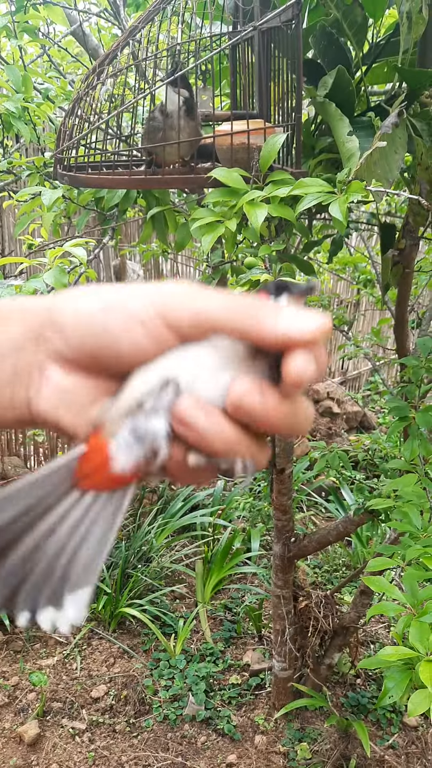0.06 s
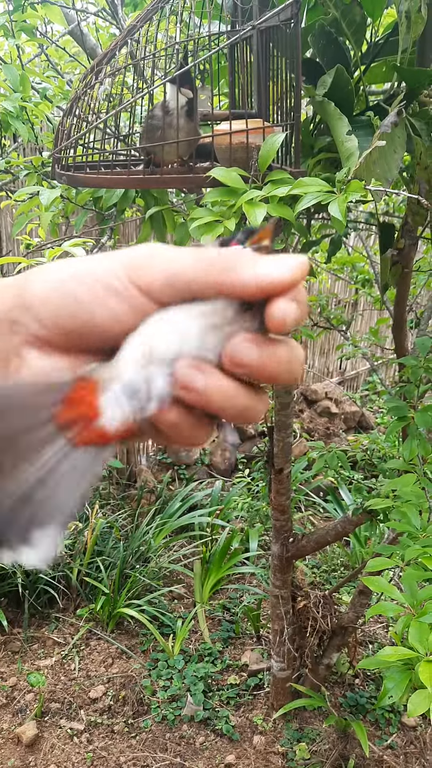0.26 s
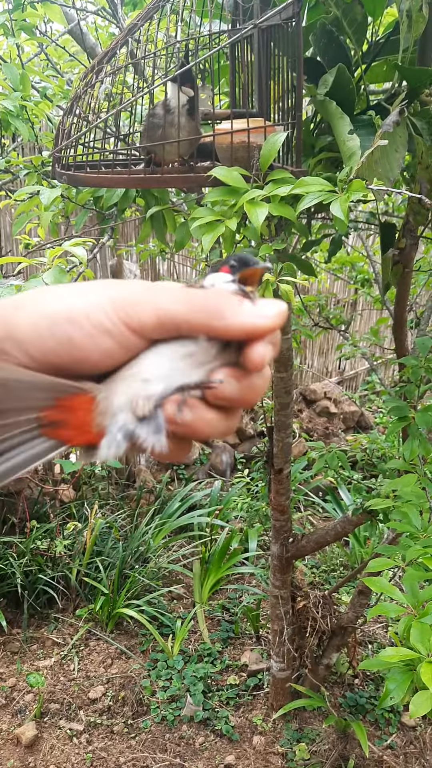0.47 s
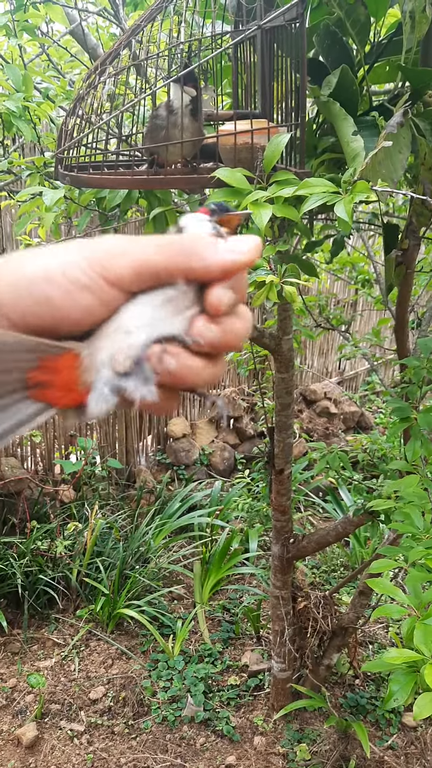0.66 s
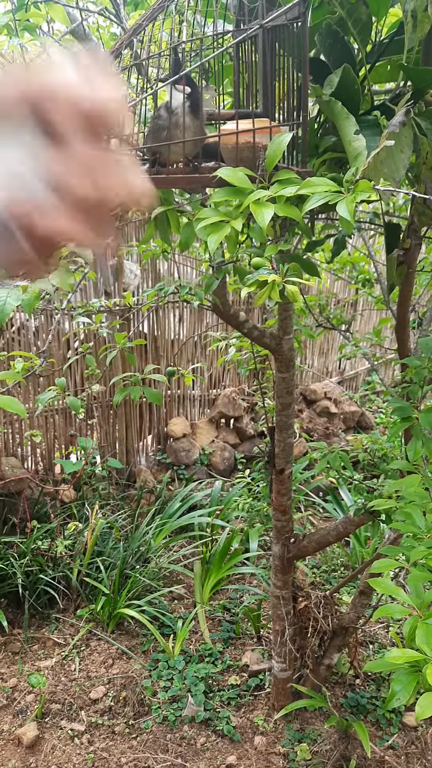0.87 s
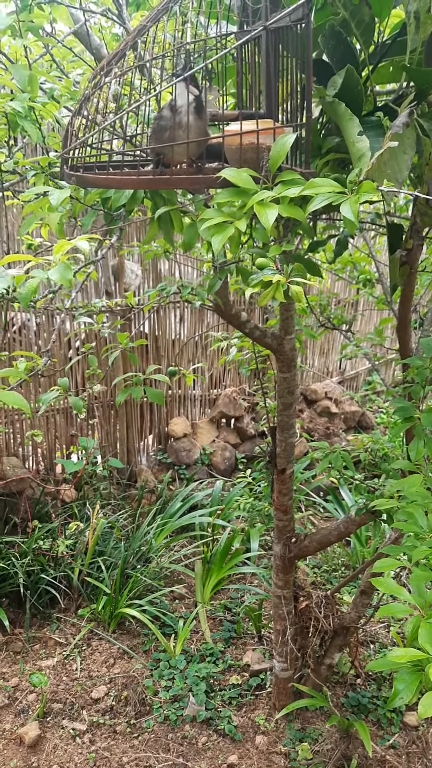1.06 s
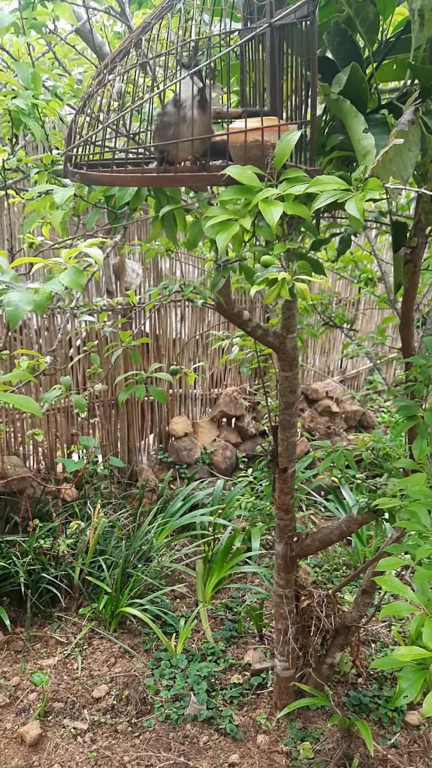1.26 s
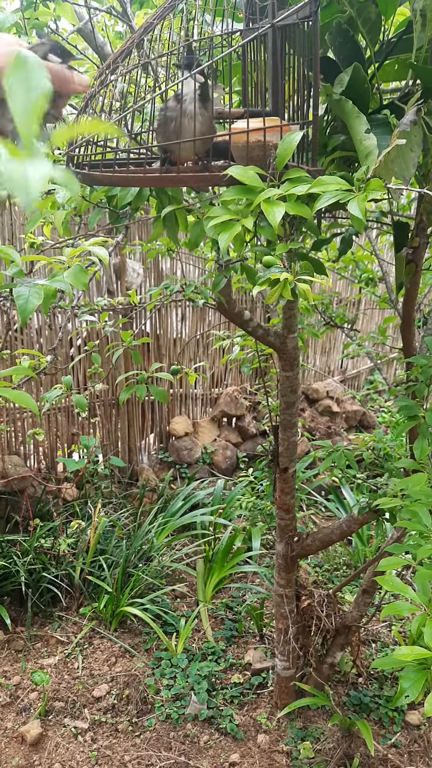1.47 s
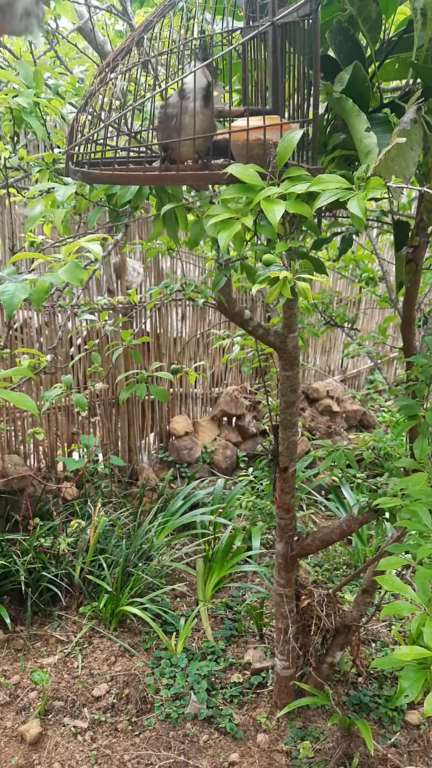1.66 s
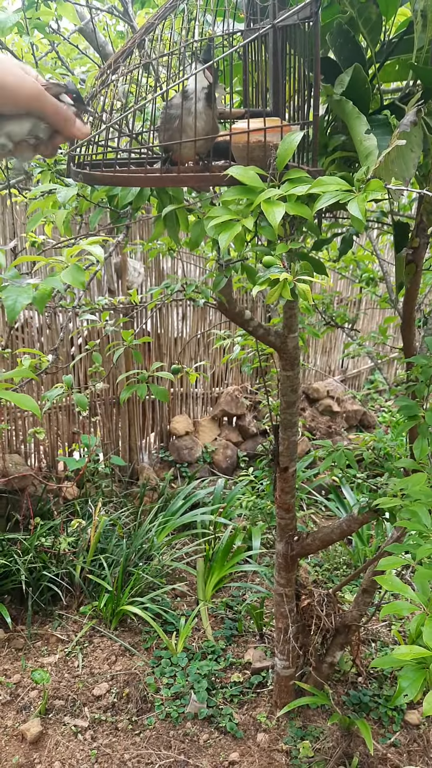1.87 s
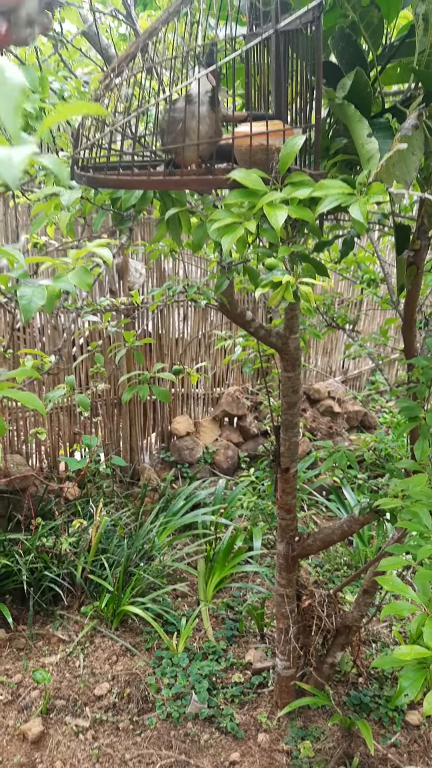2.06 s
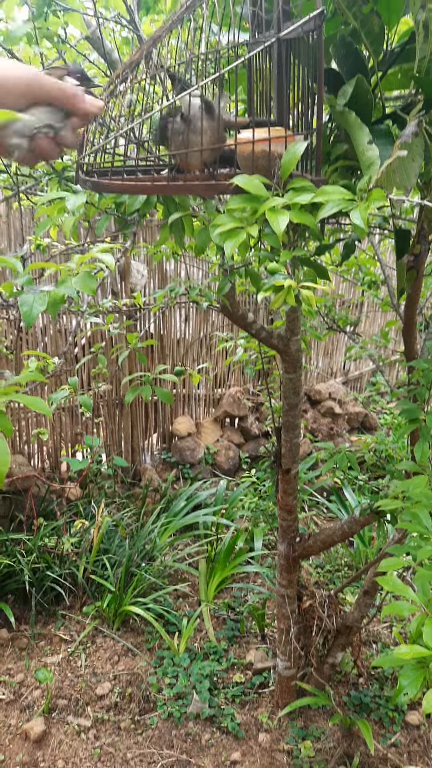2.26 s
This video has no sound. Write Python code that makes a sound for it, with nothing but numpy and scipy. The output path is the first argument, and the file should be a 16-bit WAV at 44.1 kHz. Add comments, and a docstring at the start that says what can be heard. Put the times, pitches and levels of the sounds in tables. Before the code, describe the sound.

Close up in a quiet garden, a small bird held in the hand screams three times in a raspy, trembling voice edged with hiss. Faint whimpers slip between the later cries, and a brief, weaker scream comes last.

```python
"""A faint garden hush, and almost at once a small hand-held bird screams, four times, close up.
Each scream is a fluttering tone from the trembling syrinx that keeps breaking into rasp and half-pitch
lines, shaped by the throat and topped with beak hiss. The first three fall at the end; the last is short
and weak. Two faint whimpers and a small double tick lie between them.
Hand, leaves and fence throw back sparse echoes."""
import sys
import numpy as np
from scipy import signal
from scipy.fft import rfft, irfft, next_fast_len
from scipy.io import wavfile
from scipy.ndimage import uniform_filter1d, map_coordinates

SR = 44100
rng = np.random.default_rng(int(sys.argv[2]) if len(sys.argv) > 2 else 0)


def wav_record(signal):
    """Record a signal, one row per channel, as 16-bit PCM in the file named by sys.argv[1]."""
    frames = np.transpose(np.atleast_2d(signal))
    bounded = np.clip(frames, -1, 1)
    # unit amplitude maps onto the largest positive 16-bit level
    quanta = np.round(bounded * 32767).astype(np.int16)
    wavfile.write(sys.argv[1], SR, quanta)


N = 101429

# tone colour of the garden bed: f/Hz, level/dB
GARDEN_EQ = [(20, -23), (60, -11), (100, 3), (160, -11), (300, -4.5), (600, -14.5), (1200, -19),
             (2800, -11), (4500, -27.5), (6000, -10.5), (8000, -33.5), (16000, -31.5)]
# contour of each scream: t/s, pitch/Hz, fundamental/dB, octave/dB, upper partials/dB, hiss/dB
SCREAM_1 = [(0.11, 1130, -69, -59.5, -65.5, -97), (0.155, 1128, -50.5, -35, -46, -71.5),
            (0.2, 1207, -41.5, -18, -33.5, -46), (0.25, 1330, -42.5, -22.5, -26.5, -46.5),
            (0.31, 1470, -39, -19, -21.5, -28.5), (0.355, 1605, -36.5, -19.5, -27.5, -29),
            (0.39, 1868, -29, -24.5, -26.5, -31), (0.425, 1966, -30.5, -24.5, -26.5, -28),
            (0.45, 2035, -27, -25, -22.5, -29), (0.49, 2029, -24.5, -24, -25.5, -24.5),
            (0.54, 1991, -26, -24, -23.5, -26), (0.585, 2036, -23, -24, -30.5, -27.5),
            (0.62, 2089, -21, -21.5, -25, -29.5), (0.634, 1135, -47, -42, -45.5, -85)]
SCREAM_2 = [(0.772, 1750, -56.5, -54, -64, -54), (0.79, 1678, -42.5, -40, -44.5, -46),
            (0.825, 1575, -39, -23, -31, -34.5), (0.885, 1503, -36, -19.5, -22, -29),
            (0.93, 1531, -36.5, -13.5, -27.5, -28.5), (0.96, 1609, -34, -14.5, -34, -30),
            (1.02, 1567, -37, -17.5, -31.5, -29.5), (1.06, 1487, -50, -21.5, -23.5, -28.5),
            (1.11, 1475, -47.5, -22.5, -32.5, -41.5), (1.145, 1612, -44, -22.5, -36, -38.5),
            (1.185, 1612, -34, -22, -29, -26.5), (1.22, 1536, -45, -23.5, -31, -32.5),
            (1.29, 1778, -30.5, -29, -40, -27.5), (1.341, 1973, -27.5, -34.5, -25, -28),
            (1.352, 1400, -53, -33.5, -47, -62)]
SCREAM_3 = [(1.495, 1798, -60.5, -58.5, -51, -55.5), (1.545, 1746, -50, -37.5, -35.5, -38.5),
            (1.59, 1780, -40, -34, -39.5, -37.5), (1.635, 1610, -45.5, -25, -44, -33.5),
            (1.67, 1645, -45.5, -28, -44, -38.5), (1.705, 1860, -42, -40, -32, -39.5),
            (1.75, 2058, -43, -30, -41.5, -38), (1.79, 1988, -42.5, -34, -30.5, -37.5),
            (1.845, 1945, -42, -33, -32.5, -32.5), (1.89, 1876, -38, -31, -36, -34),
            (1.94, 2009, -39, -30.5, -31.5, -32.5), (1.974, 2130, -35.5, -30, -38, -31),
            (1.991, 1700, -37.5, -34.5, -30.5, -49), (2.002, 1150, -50.5, -52, -47, -70)]
SCREAM_4 = [(2.2, 1556, -70, -73.5, -60.5, -68), (2.24, 1615, -49.5, -52, -46.5, -49),
            (2.265, 1760, -46, -45, -41.5, -42.5), (2.295, 1832, -41.5, -45, -41.5, -39.5)]
# how the voice breaks up: t/s, roughness/0-1, period doubling/0-1
BREAKUP = [(.12, .9, .06), (.2, .6, .06), (.31, .8, .25), (.38, .45, .2), (.46, .35, .25), (.61, .15, .2),
           (.78, .8, .03), (.88, .55, .03), (.93, .1, .02), (1.02, .12, .02), (1.06, .55, .04),
           (1.22, .55, .04), (1.31, .35, .08), (1.5, .7, .04), (1.63, .3, .02), (1.7, .5, .25),
           (1.76, .4, .9), (1.84, .5, .3), (1.92, .5, .2), (1.96, .15, .15), (2.21, .9, .05),
           (2.29, .6, .05)]
# tremolo, shallow where the tone is held steady: t/s, depth/0-1
TREMOLO = [(.2, .4), (.37, .35), (.42, .8), (.6, .55), (.8, .5), (.89, .95), (.93, .12), (1.02, .15),
           (1.05, .8), (1.2, .8), (1.3, .35), (1.64, .3), (1.72, .8), (1.92, .9), (1.95, .15), (2.29, .4)]
# partials above the octave, before the throat or hiss EQ: multiple of the pitch, level/dB
UPPER_PARTIALS = [(2.5, 12), (3, 3.5), (3.5, 15), (4, 7.5)]
TOP_PARTIALS = [(5, -4), (6, 2.5), (7, -14), (8, -19.5), (9, 4)]
# resonances of throat and beak (the last two screams share the third set): f/Hz, level/dB
THROAT_1 = [(2200, -72.5), (3000, 6.5), (3600, 3), (4400, 2), (5050, -5.5), (5600, -11.5), (6100, -23),
            (6700, -9), (7600, -31), (9000, -114)]
THROAT_2 = [(2900, -73), (3700, -15), (4300, 12), (4750, -5), (5250, 9), (6100, 9.5), (6800, -15.5),
            (7600, -7), (9000, -61)]
THROAT_3 = [(2400, -70), (2850, 6), (3150, 4.5), (3800, -8), (4500, -8), (5050, -8), (5750, -14.5),
            (6450, -1), (7400, -6.5), (9000, -83)]
# EQ of the beak hiss: f/Hz, level/dB
HISS_1 = [(5000, -78), (7600, -37.5), (8400, -3.5), (9800, -1.5), (11000, -6), (12500, -12), (14000, -1),
          (15200, 3.5), (16000, 0)]
HISS_2 = [(5000, -79.5), (7500, -4), (8500, -8.5), (9400, -3.5), (11000, -9), (12800, -16), (14000, -5),
          (15200, -4), (16000, -1)]
HISS_3 = [(5000, -65), (7500, 4), (9000, -5), (10400, 1.5), (11400, -1.5), (12700, -11.5), (14500, -8.5),
          (15500, -3), (16000, 2.5)]
# second voice from the other side of the syrinx, above the octave: t/s, f/Hz, level/dB
SECOND_VOICE = [(.12, 4900, -73), (.25, 5000, -30.5), (.45, 5080, -29.5), (.6, 5050, -50), (.64, 4900, -68),
                (.76, 5000, -49.5), (.8, 5000, -31.5), (.87, 5500, -45), (.92, 5700, -26), (.98, 5200, -27.5),
                (1.06, 5250, -27), (1.15, 5250, -28.5), (1.2, 5900, -26), (1.26, 6400, -29),
                (1.32, 5830, -27), (1.343, 5900, -27.5), (1.36, 5600, -46), (1.49, 7200, -57),
                (1.58, 7150, -33), (1.64, 6450, -28), (1.72, 6600, -36.5), (1.9, 6400, -51),
                (1.97, 6450, -35), (2.005, 5500, -57.5), (2.2, 6400, -76.5), (2.29, 6500, -54)]
# hiss sweep as the beak first opens: t/s, f/Hz, level/dB
BEAK_SWEEP = [(0.124, 8200, -67.5), (0.168, 10000, -48.5), (.21, 12000, -44), (0.249, 14800, -41),
              (.28, 15500, -45)]
# soft notes between screams: t/s, length/s, pitch/Hz, level/dB, vibrato/share of pitch
WHIMPERS = [(1.366, 0.0415, 1620, -44.5, 0.11), (2.074, 0.064, 1628, -46.5, 0.03)]
# the double tick: t/s, f/Hz, gain/dB
TICKS = [(1.399, 2020, -46), (1.435, 1947, -50.5)]
# stereo image at the two microphones: f/Hz, left minus right/dB
BALANCE_1 = [(1000, -5), (2000, 7), (3000, -0.5), (4100, -5), (5000, -1), (8000, -2), (10000, 13),
             (12000, 23), (15500, 15)]
BALANCE_2 = [(1000, 20.5), (1600, -9), (3100, -7), (5000, -4), (8000, -3), (10000, 14), (12500, 12),
             (15500, 15.5)]
BALANCE_3 = [(1000, -2.5), (2000, 16.5), (3000, -7.5), (3700, -0.5), (5000, -6.5), (8000, -3.5),
             (10500, 11.5), (12500, 6.5), (15500, 20)]

LAG_1, LAG_2, LAG_3 = 0.00021, 0.00025, 0.0002144  # delay of the right microphone/s
FLUTTER_HZ, FLUTTER_SPREAD, VIBRATO = 98, .22, .034  # rate/Hz, drift/share of rate, swing/share of pitch
JITTER_HZ, JITTER_CALM, JITTER_ROUGH = 300, .006, .028  # bandwidth/Hz, then shares of pitch


def amp(db):
    """Decibels to gain."""
    return 10 ** (np.asarray(db) / 20)


def unit(x):
    """Scales to an rms of one."""
    return x / np.sqrt(np.mean(x ** 2) + 1e-20)


def steady(x):
    """Holds the slow level at one and keeps the quick pulsing."""
    return x / np.sqrt(abs(uniform_filter1d(x ** 2, size=1200)) + 1e-9)


def curves(t, table):
    """One automation curve for each column after the time."""
    times, *columns = np.transpose(table)
    return [np.interp(t, times, column) for column in columns]


def add(mix, start, sound):
    """Mixes a sound in at a time in seconds."""
    part = mix[..., max(round(start * SR), 0):][..., :sound.shape[-1]]
    part += sound[..., :part.shape[-1]]


def colour(x, eq):
    """Applies an EQ curve of f/Hz, level/dB."""
    f, db = np.transpose(eq)
    size = next_fast_len(len(x) + 1024)
    hz = np.fft.rfftfreq(size, 1 / SR)
    gain = amp(np.interp(np.log(hz + 1), np.log(f), db))
    return irfft(rfft(x, size) * gain, size)[:len(x)]


def wander(count, hz):
    """Smooth random modulation up to a rate, with an rms of one."""
    f = np.fft.rfftfreq(count, 1 / SR)
    return unit(irfft(rfft(rng.standard_normal(count)) / (1 + (f / hz) ** 8), count))


def blend(a, b, share):
    """Equal-power crossfade from a to b."""
    share = np.clip(share, 0, 1)
    return np.sqrt(1 - share) * a + np.sqrt(share) * b


def fuzz(phase, width_hz):
    """A band of noise that rides on a partial, reaching width_hz to either side."""
    n = len(phase)
    return unit(wander(n, width_hz) * np.cos(phase) + wander(n, width_hz) * np.sin(phase))


def garden():
    """A faint steady bed of outdoor rumble and air, nearly mono."""
    shared, left, right = [unit(colour(rng.standard_normal(N), GARDEN_EQ)) for _ in range(3)]
    return amp(-70.5) * blend(shared, np.array([left, right]), 0.1)


def partials(phase, table, doubling):
    """A stack of partials of unit power; half multiples sound only with period doubling."""
    gains = [amp(db) * (doubling if round(2 * k) % 2 else np.ones(len(phase))) for k, db in table]
    stack = sum(g * np.cos(k * phase + rng.uniform(0, 2 * np.pi)) for g, (k, _) in zip(gains, table))
    return stack / np.sqrt(sum(g ** 2 for g in gains) / 2)


def throat_noise(pitch, throat, tracking):
    """Noise in the throat resonances, which follow the pitch by the exponent `tracking`."""
    position = np.cumsum((pitch / np.median(pitch)) ** tracking)
    noise = colour(rng.standard_normal(2 * len(pitch)), throat)
    return unit(map_coordinates(noise, [position], mode="wrap"))


def second_voice(t, flutter):
    """A narrow band of noise, the syrinx's second voice, that wavers with the flutter."""
    hz, db = curves(t, SECOND_VOICE)
    phase = 2 * np.pi * np.cumsum(hz * (1 + VIBRATO * flutter)) / SR
    return amp(db) * fuzz(phase, width_hz=230)


def scream(contour, throat, hiss_eq, tracking):
    """A trembling syrinx: tone and rasp come in quick bursts, with beak hiss on top."""
    t = np.arange(contour[0][0] - .004, contour[-1][0] + .006, 1 / SR)
    n = len(t)
    pitch, low_db, octave_db, upper_db, top_db = curves(t, contour)
    rough, doubling = np.clip(curves(t, BREAKUP), 0, 1)
    tremolo, = curves(t, TREMOLO)

    # one flutter drives both pitch and loudness
    flutter_hz = FLUTTER_HZ * (1 + FLUTTER_SPREAD * wander(n, 60.43))
    flutter = np.sin(2 * np.pi * np.cumsum(flutter_hz) / SR)
    jitter = (JITTER_CALM + JITTER_ROUGH * rough * (1 - .1 * flutter)) * wander(n, JITTER_HZ)
    phase = 2 * np.pi * np.cumsum(pitch * (1 + VIBRATO * flutter + jitter)) / SR
    burst = steady(1 + np.tanh(tremolo * (flutter + .3 + .3 * wander(n, 120))))
    gaps = 1 - 0.71 * rough * flutter  # swells between the bursts

    # four layers, each crossfading from tone to noise as the voice roughens
    low = blend(np.cos(phase) * np.sqrt(2), fuzz(phase, width_hz=243), 0.41 * rough) * burst
    low += amp(-18.5) * np.minimum(doubling, .25) * fuzz(phase / 2, width_hz=35)  # half-pitch line

    octave_tone = partials(phase, [(1.5, 6), (2, 0)], doubling ** 2) * burst
    octave = blend(octave_tone, fuzz(2 * phase, width_hz=330) * gaps, .6 * rough ** 2)

    rasp = throat_noise(pitch, throat, tracking) * blend(gaps, burst, 0.3)
    upper_tone = steady(colour(partials(phase, UPPER_PARTIALS, doubling), throat)) * burst
    upper = blend(upper_tone, unit(rasp), 0.11 + 0.64 * rough)

    hiss = unit(colour(rng.standard_normal(n), hiss_eq)) * (1 + .15 * flutter)
    top_tone = unit(colour(partials(phase, TOP_PARTIALS, doubling), hiss_eq))
    top = blend(top_tone, hiss, 0.82 + 0.17 * rough)

    voice = amp(low_db) * low + amp(octave_db) * octave + amp(upper_db) * upper + amp(top_db) * top
    voice += second_voice(t, flutter) * burst
    fade = np.clip(np.minimum(t - t[0], t[-1] - t) / .004, 0, 1)
    return t[0], fade * voice


def beak_opening():
    """A band of hiss that sweeps up as the beak opens."""
    t = np.arange(BEAK_SWEEP[0][0], BEAK_SWEEP[-1][0], 1 / SR)
    hz, db = curves(t, BEAK_SWEEP)
    return t[0], amp(db) * fuzz(2 * np.pi * np.cumsum(hz) / SR, width_hz=2400)


def whimper(start, length, pitch_hz, db, vibrato):
    """A soft note that arches in pitch and level, with a weak breathy octave."""
    t = np.arange(0, length, 1 / SR)
    arch = np.sin(np.pi * (t / length) ** 1.23)
    flutter = vibrato * np.sin(2 * np.pi * FLUTTER_HZ * t)
    jitter = .025 * wander(len(t), JITTER_HZ)
    hz = pitch_hz * (1 - 0.128 * (1 - arch) + flutter + jitter)
    phase = 2 * np.pi * np.cumsum(hz) / SR
    return start, amp(db) * arch * (np.cos(phase) + amp(-14.5) * fuzz(2 * phase, width_hz=136))


def tick(start, hz, db, rise_s=0.00122):
    """A small dull tick: a blip of band noise with a rounded attack."""
    t = np.arange(0, .02, 1 / SR)
    envelope = (t / rise_s) ** 2 * np.exp(-t / rise_s)
    return start - rise_s, amp(db) * envelope * fuzz(2 * np.pi * hz * t, width_hz=640)


def microphones(x, balance, lag_s):
    """Pans each frequency between two microphones at constant power; the right hears it later."""
    left_eq = [(hz, 10 * np.log10(2 / (1 + amp(-2 * db)))) for hz, db in balance]
    right_eq = [(hz, 10 * np.log10(2 / (1 + amp(2 * db)))) for hz, db in balance]
    delay = np.exp(-2j * np.pi * np.fft.rfftfreq(len(x), 1 / SR) * lag_s)
    return np.array([colour(x, left_eq), irfft(rfft(colour(x, right_eq)) * delay, len(x))])


def reflections(x, t60_s, treble_db):
    """Sparse echoes from hand, leaves and fence, different at each microphone."""
    t = np.arange(SR // 2) / SR
    taps = rng.standard_normal((2, len(t))) * (rng.random((2, len(t))) < .06)
    taps *= (t > .0005) * amp(-60 * t / t60_s)
    taps /= np.linalg.norm(taps, axis=1, keepdims=True)
    eq = [(4500, 7.5), (7500, treble_db / 2), (11000, treble_db)]
    response = np.array([colour(side, eq) for side in taps])
    return signal.fftconvolve(x, response, axes=1)[:, :N]


def scene():
    """The bird, a little to the left, with its echoes over the garden bed."""
    cues = [(beak_opening(), BALANCE_1, LAG_1),
            (scream(SCREAM_1, THROAT_1, HISS_1, tracking=0.027), BALANCE_1, LAG_1),
            (scream(SCREAM_2, THROAT_2, HISS_2, tracking=0.6), BALANCE_2, LAG_2),
            (scream(SCREAM_3, THROAT_3, HISS_3, tracking=0.12), BALANCE_3, LAG_3),
            (scream(SCREAM_4, THROAT_3, HISS_3, tracking=0.12), BALANCE_3, LAG_3)]
    cues += [(whimper(*row), BALANCE_3, LAG_3) for row in WHIMPERS]
    cues += [(tick(*row), BALANCE_3, LAG_3) for row in TICKS]
    bird = np.zeros((2, N))
    for (start, sound), balance, lag_s in cues:
        add(bird, start, microphones(sound, balance, lag_s))
    bright_early = amp(-21) * reflections(bird, t60_s=0.075, treble_db=20)
    dark_tail = amp(-37.5) * reflections(bird, t60_s=0.28, treble_db=0)
    return bird + bright_early + dark_tail + garden()


def record(dry):
    """A steep high cut takes off the very top of the air."""
    high_cut = signal.firwin(511, 15850, window=("kaiser", 9), fs=SR)
    return signal.oaconvolve(dry, high_cut[None], "same")


dry = scene()
out = record(dry)
wav_record(out)
```